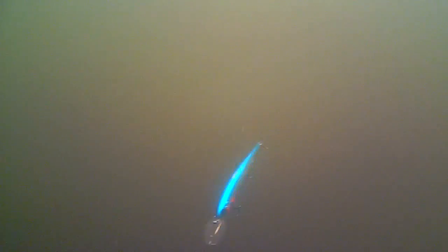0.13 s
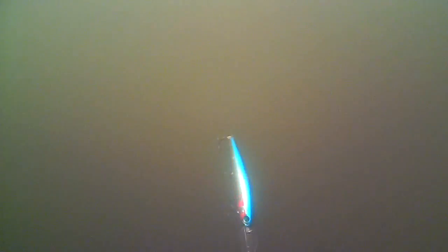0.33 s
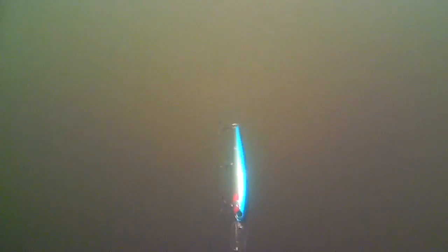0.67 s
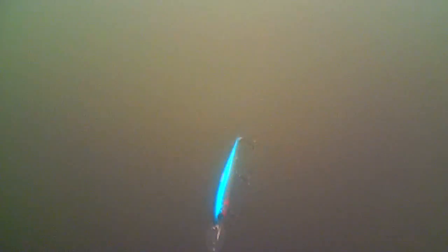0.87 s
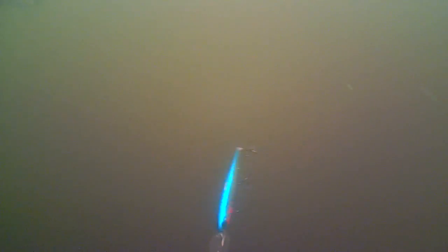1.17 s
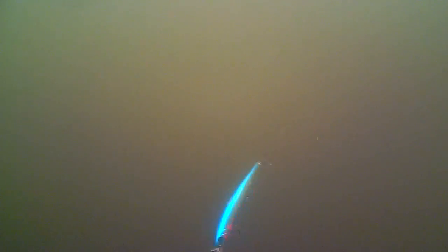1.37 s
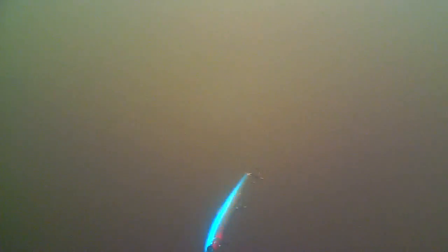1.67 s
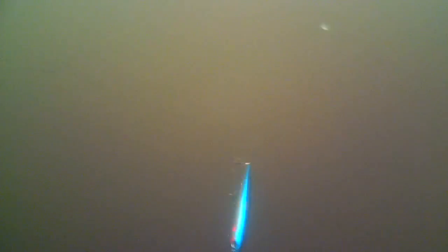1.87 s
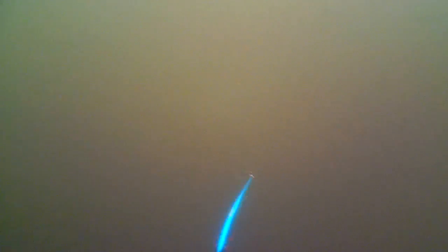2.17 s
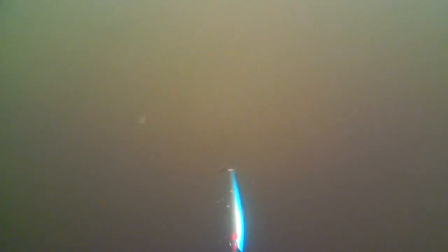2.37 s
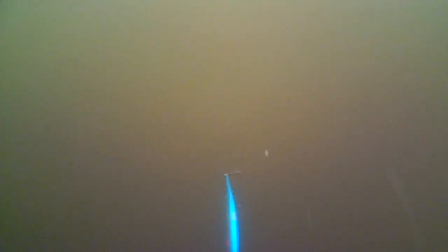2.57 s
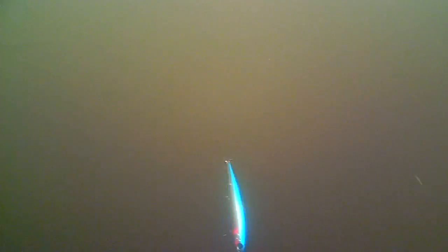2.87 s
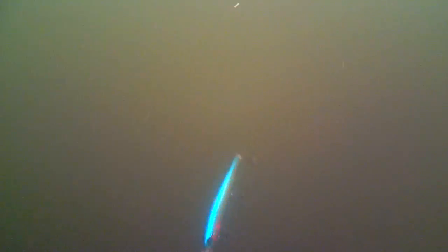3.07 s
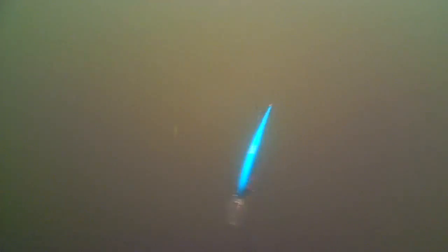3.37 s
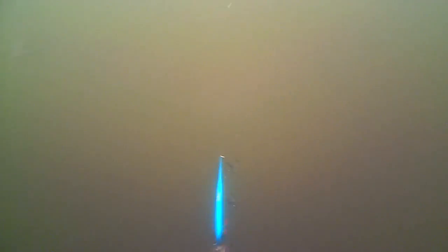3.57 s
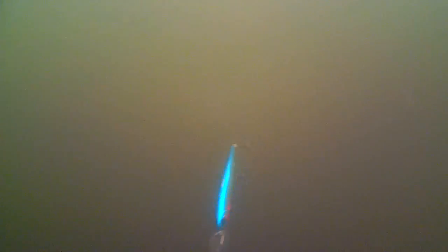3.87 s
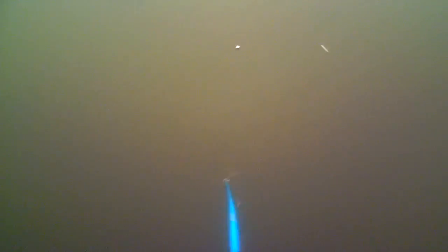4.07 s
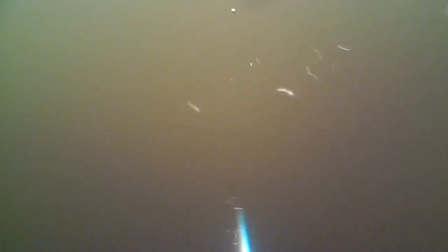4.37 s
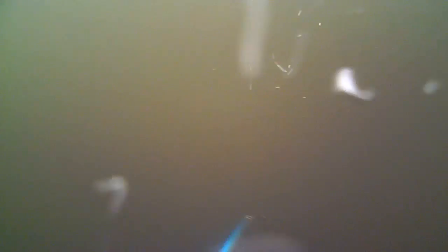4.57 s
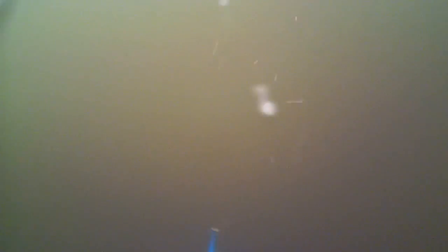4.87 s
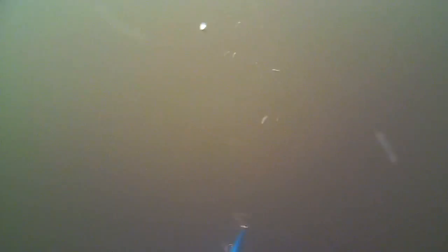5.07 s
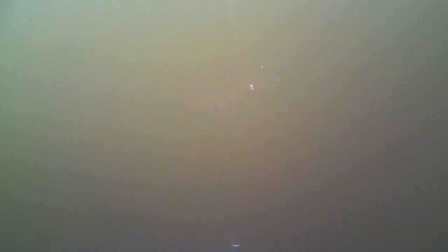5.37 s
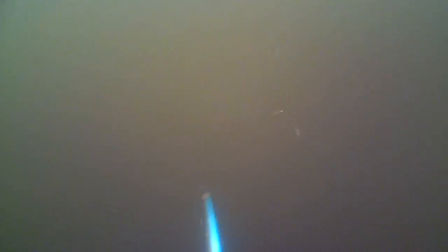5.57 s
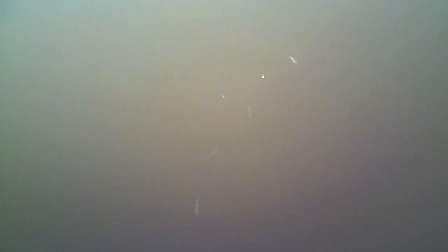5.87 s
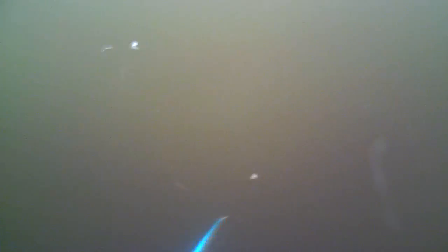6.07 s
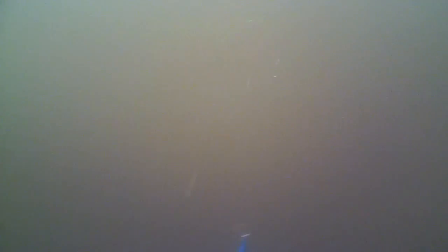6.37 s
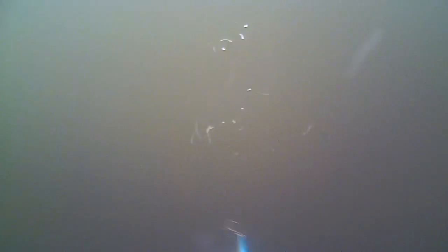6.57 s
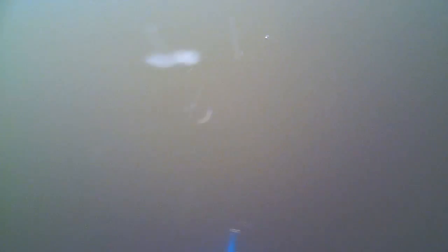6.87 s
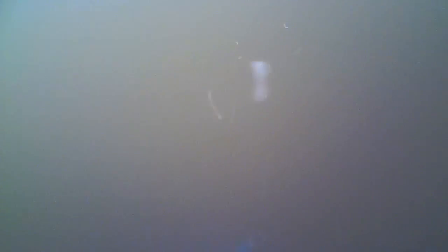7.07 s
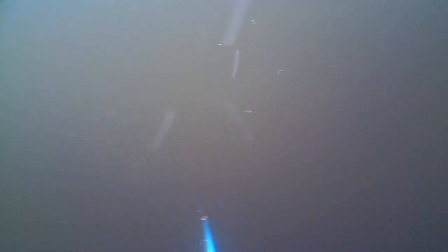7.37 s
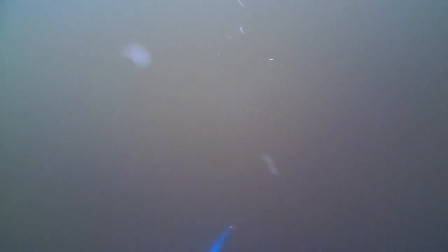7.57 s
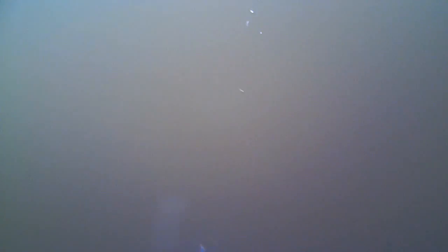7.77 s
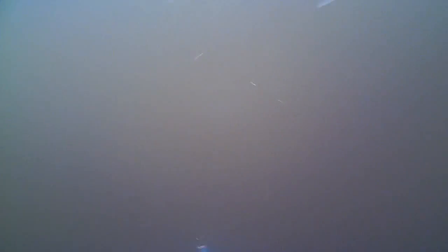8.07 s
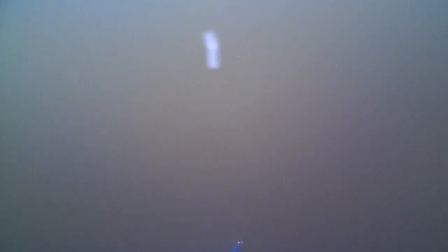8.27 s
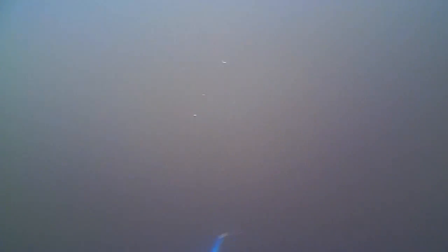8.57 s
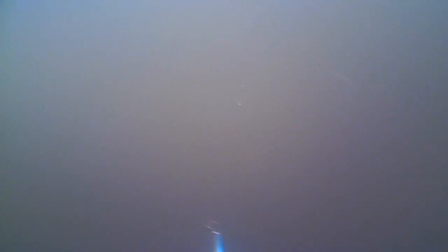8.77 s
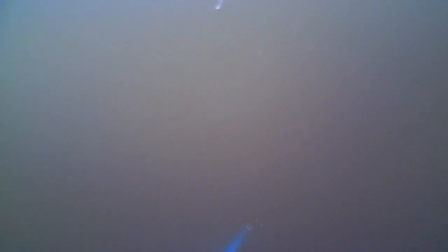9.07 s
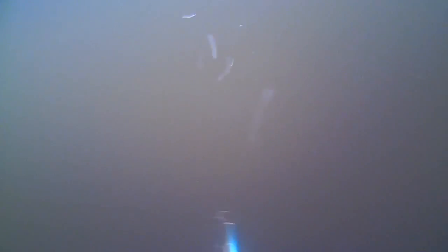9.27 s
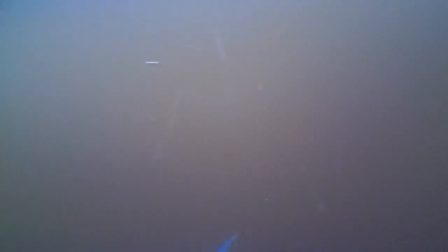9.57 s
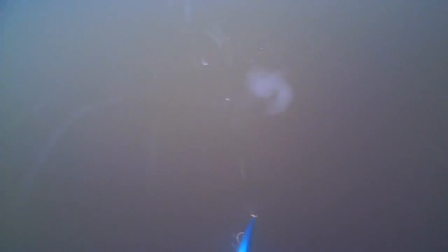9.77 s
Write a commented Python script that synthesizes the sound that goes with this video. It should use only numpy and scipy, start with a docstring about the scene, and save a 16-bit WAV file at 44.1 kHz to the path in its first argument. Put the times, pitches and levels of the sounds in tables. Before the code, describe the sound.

A close, dry underwater sound through a camera's shell. For four seconds, small hard metallic ticks come several times a second over quiet hiss, with barely audible line moans. Then sharp bubble pops and knocks lead into a dense clatter, a fluttering mid-high whine with squeaks, and fizzing, pulsing water. The whine drops out for a moment before six seconds, slow ticks return, and the loud rattling surge resumes until the end.

```python
"""A swivel rattles against the hard housing of a camera towed on a fishing line, a lure wagging behind it.
At first each slow wag gives a few separate ticks, a faint pluck and now and then a moan of the line.
Then the tow speeds up: some sixteen swings a second make the swivel clatter and the taut line whine up and down.
Sparse bubbles ping on the shell. The speed of the tow sets the pitch of the whine and the level of whine,
rattle and rushing water. Contacts ring resonances, the line is sines, and the water is coloured noise."""
import sys
import numpy as np
from scipy import signal
from scipy.fft import rfft, irfft
from scipy.io import wavfile

SR = 44100
rng = np.random.default_rng(int(sys.argv[2]) if len(sys.argv) > 2 else 0)


def digitize_waveform(pressure):
    """Quantize a signal to 16-bit integers and store it at the path in sys.argv[1].

    Rows of a 2-D input are taken as channels; values are limited to [-1, 1].
    """
    field = np.atleast_2d(pressure).T
    bounded = np.clip(field, -1, 1)
    quanta = np.round(bounded * 32767).astype(np.int16)
    wavfile.write(sys.argv[1], SR, quanta)


N = 437472
TIME = np.arange(N) / SR   # s

# slow wags of the lure: start_s [s], level_db [dB, before the trim of each kind of tick]
WAGS = [(0.1796, -30.5), (0.3078, -29), (0.4928, -29.5), (0.6235, -30.5), (0.833, -31.5), (0.9871, -27.5),
        (1.1455, -29), (1.2605, -26), (1.39, -28), (1.512, -26.5), (1.6707, -28.5), (1.7877, -27.5),
        (1.9592, -30), (2.0863, -27.5), (2.248, -29), (2.371, -28.5), (2.5243, -25.5), (2.6399, -27),
        (2.7869, -27.5), (2.9091, -29.5), (3.0744, -29.5), (3.2275, -32.5), (3.481, -35), (3.6956, -31.5),
        (3.8742, -28.5), (3.9692, -23.5), (5.7955, -25), (5.91, -21.5), (6.1702, -23.5), (6.2893, -21.5)]

CRUISE_HZ = 1400      # top pitch of the whine at cruising speed
PULL_AWAY_S = 4.09    # the tow gets up to speed
SLACK_S = .0125       # the slack goes this long before the main tick of a wag


def from_db(db):
    """Decibels to gain."""
    return 10 ** (np.asarray(db) / 20)


def rms_one(x):
    """Scale to an rms of 1."""
    return x / np.sqrt(np.mean(x ** 2) + 1e-20)


def drift(rate_hz):
    """Slow chance with a spread of 1: white noise that falls away above the given rate."""
    hz = np.arange(N // 2 + 1) * SR / N
    white = rfft(rng.standard_normal(N))
    return rms_one(irfft(white / (1 + (hz / rate_hz) ** 2), N))


def noise(spectrum):
    """Noise of a given colour, rms 1."""
    hz, db = np.transpose(spectrum)
    bins = np.maximum(np.arange(N // 2 + 1) * SR / N, 1)
    gain = from_db(np.interp(np.log(bins), np.log(hz), db, left=-80, right=-80))
    return rms_one(irfft(rfft(rng.standard_normal(N)) * gain, N))


def ring(clicks, hz, width_hz):
    """A resonance: a unit click sets a sine of height 1 ringing, which dies sooner the wider the resonance."""
    radius = np.exp(-np.pi * width_hz / SR)
    angle = 2 * np.pi * hz / SR
    return signal.lfilter([0, np.sin(angle)], [1, -2 * radius * np.cos(angle), radius ** 2], clicks + 1e-18)


def swell_ring(clicks, hz, width_hz):
    """Two like resonances in a row: the ring builds up to a height of 1, then dies."""
    twice = ring(ring(clicks, hz, width_hz), hz, width_hz)
    return twice * 2 * np.e * np.pi * width_hz / SR


def clicks_at(s, gain):
    """A train of single clicks."""
    samples = np.clip(np.round(np.atleast_1d(s) * SR).astype(int), 0, N - 1)
    return np.bincount(samples, np.atleast_1d(gain), N)


def strike(s, db, tilt_db, spread_db, bounce_db=-10, bounce_s=0.001213, slide_db=-37, slide_s=0.0062,
           scatter_db=2.5):
    """Contacts ring the housing; tilt (dB per octave) is their hardness; each bounces once and slides a little."""
    # resonances of the housing: pitch_hz [Hz], width_hz [Hz], level_db [dB]
    housing = [(1800, 360, -22.5), (3010, 190, -36), (3493, 405, -7), (4596, 390, -1), (5180, 260, -10.5),
               (5630, 470, -11), (5895, 580, -19), (6938, 403, -11), (7670, 280, -22.5), (8230, 325, -25),
               (10800, 860, -34.5), (13100, 620, -36)]
    pivot_hz = 4550        # the tilt turns about this pitch
    soft_limit_hz = 4630   # below this every contact is short enough to ring the modes alike

    hardness = tilt_db + spread_db * rng.uniform(-1, 1, len(s))
    again = s + bounce_s * rng.uniform(.5, 1.4, len(s))
    sign = rng.choice([-1, 1], len(s))

    # a slide is noise under a pressure that dies away after each contact
    touches = clicks_at(s, from_db(db + slide_db))
    pressure = signal.lfilter([1], [1, -np.exp(-1 / (slide_s * SR))], touches + 1e-18)
    slide = pressure * rng.standard_normal(N)

    out = np.zeros(N)
    for hz, width_hz, mode_db in housing:
        octaves = np.log2(max(hz, soft_limit_hz) / pivot_hz)
        hit_db = db + hardness * octaves + scatter_db * rng.standard_normal(len(s))
        gain = sign * from_db(hit_db)
        hits = clicks_at(np.r_[s, again], np.r_[gain, gain * from_db(bounce_db)])
        out += from_db(mode_db) * swell_ring(hits + slide, hz, width_hz)
    return out


def tow():
    """Speed in doublings above cruising, and swings counted through time (whole numbers at their fastest instants)."""
    # course of the tow: time_s [s], top_pitch_hz [Hz, whine before scatter], swings [count since the row before]
    course = [(4.157, 1264, 0), (4.413, 1359, 4), (4.683, 1261, 4), (4.95, 1371, 4), (5.152, 1273, 3),
              (5.31, 1178, 2), (5.437, 1406, 2), (5.565, 1364, 2), (5.739, 920, 2), (6.32, 896, 6),
              (6.378, 1390, 1), (6.48, 1500, 2), (7.12, 1500, 11), (7.42, 1421, 5), (7.564, 1319, 2),
              (8.2, 1279, 9), (8.39, 1470, 3), (8.595, 1268, 3), (8.864, 1379, 4), (9.185, 1408, 5),
              (9.354, 1503, 3), (9.612, 1294, 4), (9.775, 1598, 3.5), (9.89, 1461, 2.5)]
    s, hz, swings = np.transpose(course)
    done = np.cumsum(np.round(swings))
    rate = np.diff(done) / np.diff(s)

    # the first and last swing rates carry on beyond the table
    phase = np.interp(TIME, s, done)
    phase = phase + rate[0] * np.minimum(TIME - s[0], 0) + rate[-1] * np.maximum(TIME - s[-1], 0)
    speed = np.log2(np.interp(TIME, s, hz) / CRUISE_HZ)
    return speed, phase


def per_swing(phase):
    """Chance with a spread of 1, drawn anew for each swing and gliding from one to the next."""
    swings = np.arange(int(phase[-1]) + 2)
    return np.interp(phase, swings, rng.standard_normal(len(swings)))


def hiss(level_db=-59):
    """The steady noise floor: coloured noise at one level throughout."""
    # spectrum of the floor: pitch_hz [Hz], level_db [dB per Hz, relative]
    floor = [(40, 9.5), (130, 14), (330, 10), (460, 9.5), (620, 6), (1500, 3.5), (3400, 2.5), (5500, -1),
             (15000, -2), (16200, -7)]
    return from_db(level_db) * noise(floor)


def water(speed, phase, throb_db=3.0, fizz_throb_db=5.0, idle_db=-63.0, lumpy_db=1.0):
    """Water rushes and fizzes along the shell, throbbing with the swings; eddies buffet it."""
    # spectra of the three noises: pitch_hz [Hz], level_db [dB per Hz, relative]
    rush_colour = [(300, -40), (480, 8.5), (680, -26.5), (850, -1), (1050, -6.5), (1450, 10), (1900, 3.5),
                   (2200, 3.5), (2500, -4.5), (2900, 7), (3150, 5), (3450, 15), (3900, -1), (4550, 1.5),
                   (6500, -6.5)]
    fizz_colour = [(4000, -44), (8000, 4.5), (9700, -1.5), (10900, -3), (11900, -2), (12800, -4.5),
                   (14000, -8), (15200, -3), (16200, -12)]
    rumble_colour = [(18, 4), (35, 0.5), (55, -3), (100, -10), (200, -23), (400, -39)]
    # big eddies: centre_s [s], level_db [dB, before the lumpiness], half_length_s [s]
    eddy_table = [(3.754, -52.5, .05), (6.8, -55, 0.56), (6.778, -50, .025), (6.869, -58, 0.024),
                  (9.278, -50, 0.089), (9.78, -48.5, .12)]
    # dB at cruising speed, and dB gained per doubling of the speed
    rush_db, rush_growth_db = -44, 17.5
    fizz_db, fizz_growth_db = -61, 20
    buffet_db, buffet_growth_db = -61, 18

    throb = np.cos(2 * np.pi * (phase + 0.092))
    towed = np.interp(TIME - PULL_AWAY_S, [-.2, 0], [0, 1]) ** 3

    rush_level = rush_db + rush_growth_db * speed + throb_db * throb + 3 * drift(68)
    rush = from_db(rush_level) * noise(rush_colour)

    fizz_level = fizz_db + fizz_growth_db * speed + fizz_throb_db * throb
    fizz_level = fizz_level + 6.25 * drift(140) + 0.5 * drift(4.3)
    fizz = from_db(fizz_level) * noise(fizz_colour)

    eddies = sum(from_db(db) * np.exp(-((TIME - s) / half_s) ** 2) for s, db, half_s in eddy_table)
    eddies = eddies * from_db(lumpy_db * drift(15))
    steady = towed * from_db(buffet_db + buffet_growth_db * speed)
    # the powers of the idle rumble, the tow and the eddies add
    buffet = np.sqrt(from_db(idle_db) ** 2 + steady ** 2 + eddies ** 2)
    return towed * (rush + fizz) + buffet * noise(rumble_colour)


def slow_ticking(main_db=-3, lead_db=-11.0, chaser_db=-10, chaser_s=.009, rebound_db=-10, rebound_s=0.037,
                 settle_db=-16, settle_fall_db=110, lead_tilt_db=11, main_tilt_db=-6, settle_tilt_db=1,
                 tick_scatter_db=2.5, count=4):
    """Each wag: a bright tick as the slack goes, the main tick and its chaser, a rebound, then settling ticks."""
    s, db = np.transpose(WAGS)
    chase = chaser_s * rng.uniform(0.8, 1.2, len(s))
    rebound = rebound_s * rng.uniform(.7, 1.1, len(s))
    after = chase + np.cumsum(rng.uniform(.006, 0.0089, (count, len(s))), axis=0)
    times = np.vstack([s - SLACK_S, s, s + chase, s + rebound, s + after])

    # rows: lead, main, chaser, rebound, then settling ticks that fall by settle_fall_db per second
    first_four = np.outer([lead_db, main_db, chaser_db, rebound_db], np.ones(len(s)))
    levels = db + np.vstack([first_four, settle_db - settle_fall_db * after])
    levels[2:] += tick_scatter_db * rng.standard_normal(levels[2:].shape)

    row_tilts = [lead_tilt_db, main_tilt_db, settle_tilt_db, main_tilt_db] + [settle_tilt_db] * count
    tilts = np.repeat(row_tilts, len(s))
    return strike(times.ravel(), levels.ravel(), tilts, spread_db=4.5)


def pluck(level_db=-34, hz=1900, width_hz=40, count=5):
    """Taking up the slack plucks the rig, whose cluster of modes rings faintly for a moment."""
    s, db = np.transpose(WAGS)
    out = np.zeros(N)
    for detune in np.linspace(.9, 1.07, count):
        gain = from_db(db + level_db) * rng.standard_normal(len(s))
        out += ring(clicks_at(s - SLACK_S, gain), hz * detune, width_hz)
    return out


def moans(hz=470, rise=1.6, width_s=0.026):
    """At slow tow the line only moans briefly, rising a little as a wag pulls on it."""
    # moans of the line: centre_s [s], level_db [dB]
    moan_table = [(1.22, -66), (1.46, -67), (1.58, -65), (1.71, -68), (2.451, -62), (2.58, -59),
                  (2.721, -63), (2.849, -55.5)]
    out = np.zeros(N)
    waver = 1 + 0.036 * drift(39)
    for s, db in moan_table:
        age = np.clip(TIME - s, -.2, .2)
        pitch_hz = hz * (1 + rise * age) * waver
        swell = np.exp(-(age / width_s) ** 2)
        out += from_db(db) * swell * np.sin(2 * np.pi * np.cumsum(pitch_hz) / SR)
    return out


def bubbles(thud_width_hz=260, burst_s=0.0029):
    """A bubble bursts on the shell with a short rough ping and a thud."""
    # bubbles: start_s [s], peak_db [dB], pitch_hz [Hz], t60_s [s, ping falls 60 dB], thud_db [dB, thud against ping]
    bubble_table = [(1.8587, -28.5, 3780, 0.012, -6), (3.9215, -21.5, 7850, 0.0069, -22),
                    (4.087, -33, 2760, .012, -20), (4.1013, -19, 3400, 0.0075, -41),
                    (4.1445, -18, 3550, 0.019, -34), (4.224, -18, 9600, 0.0016, -28),
                    (5.63, -47, 11100, 0.0043, -20), (5.863, -28, 3590, 0.01, -2),
                    (6.0957, -39, 10800, .005, -18)]
    # the housing answers a soft blow at these pitches: pitch_hz [Hz]
    thud_pitches = [1120, 1470, 1790, 2060, 4900]
    highpass = signal.butter(4, 950, "high", fs=SR, output="sos")

    out = np.zeros(N)
    age = np.arange(SR // 20) / SR
    for s, db, hz, t60, thud_db in bubble_table:
        # one click and a short burst of noise
        push = np.exp(-age / burst_s) * rng.standard_normal(len(age)) * 0.08 + (age == 0)
        ping = ring(push, hz, np.log(1000) / (np.pi * t60))
        thud = sum((-1) ** k * ring(push, thud_hz, thud_width_hz) for k, thud_hz in enumerate(thud_pitches))
        blow = signal.sosfilt(highpass, ping + from_db(thud_db) * thud)
        at = round(s * SR)
        out[at:at + len(blow)] += from_db(db) * blow / np.abs(blow).max()
    return out


def knocks(speed, phase, hard_db=-1, lead_turns=.22, loose_turns=.12, spread_db=2.0):
    """The swivel knocks about once in each swing, just before its fastest instant; listed knocks are much harder."""
    # the hardest knocks: start_s [s], level_db [dB, before the trim hard_db]
    hard_knocks = [(4.0485, -24.5), (4.0638, -24), (4.0763, -21), (4.201, -22.5), (4.3334, -20),
                   (4.39, -21), (4.519, -19), (4.7367, -21), (4.9249, -19), (5.2851, -25.5), (5.5464, -21),
                   (5.7174, -30), (5.986, -23.5), (5.9944, -23), (6.012, -24.5), (6.1234, -27),
                   (6.4691, -19), (6.5247, -19.5), (6.5757, -19.5), (6.7593, -18), (6.9181, -18),
                   (6.9834, -18), (7.04, -18.5), (7.2772, -18.5), (7.889, -18), (7.952, -18), (8.2339, -19),
                   (8.434, -20.5), (8.4944, -19.5), (8.726, -24), (8.7842, -21.5), (9.654, -17),
                   (9.7256, -18), (9.763, -18), (9.774, -19), (9.8206, -19.5), (9.8672, -18)]
    knock_db, knock_growth_db = -25.5, 11   # dB at cruising speed, dB per doubling of the speed

    s, db = np.transpose(hard_knocks)
    swings = np.arange(int(phase[-1]) + 1)
    turns = swings - lead_turns + loose_turns * rng.standard_normal(len(swings))
    when = np.interp(turns, phase, TIME)
    level = knock_db + knock_growth_db * np.interp(when, TIME, speed)
    level = level + spread_db * rng.standard_normal(len(swings))
    # an ordinary knock gives way to a hard one close by
    free = np.abs(when[:, None] - s).min(axis=1) > .008
    return np.r_[s, when[free]], np.r_[db + hard_db, level[free]]


def clatter(speed, phase, bunch_db=5.5, lead_turns=0.32, gap_s=.0058,
            light_tilt_db=5.0, snap_tilt_db=3.5, snap_turns=0.5, count=1200):
    """Hard knocks, and a light rattle that is strongest while each swing gathers speed."""
    rattle_db, rattle_growth_db = -31, 20.5   # dB at cruising speed, dB per doubling of the speed
    swing_scatter_db, tick_scatter_db, ceiling_db = 2.2, 4.8, -24

    s, db = knocks(speed, phase)
    light = PULL_AWAY_S + np.cumsum(gap_s * rng.uniform(0.44, 1.9, count))
    at = np.interp(light, TIME, phase)
    level = rattle_db + rattle_growth_db * np.interp(light, TIME, speed)
    level = level + bunch_db * np.cos(2 * np.pi * (at + lead_turns))
    level = level + swing_scatter_db * np.interp(light, TIME, per_swing(phase))
    level = np.minimum(level + tick_scatter_db * rng.standard_normal(count), ceiling_db)

    # the first ticks of a swing, as the slack goes, are the brightest
    tilt = light_tilt_db + snap_tilt_db * np.cos(2 * np.pi * (at + snap_turns))
    level = level - .5 * np.maximum(tilt, 0)   # brighter ticks are set lower

    # the swivel cannot touch twice at once: no light tick close to a knock
    free = (np.abs(light[:, None] - s).min(axis=1) > .003) & (light < TIME[-1])
    hard = strike(s, db, tilt_db=-3, spread_db=2.5)
    return hard + strike(light[free], level[free], tilt[free], spread_db=5)


def singing_line(speed, phase, slowest=.65, steadying=.33, swell_db=54, trough_db=-53, trough_growth_db=5,
                 hum_db=-52, pull_growth_db=5, hum_hz=480, hum_width_hz=110,
                 overtone_db=-17, overtone_scatter_db=3, waver=0.02818, squeak_s=0.013):
    """Vortices leave the line at a rate that follows its speed: a hum across the flow, a whine at twice that along it."""
    # the loudest squeaks, an octave above the whine: centre_s [s], level_db [dB]
    squeak_table = [(4.872, -44), (5.07, -43), (5.422, -37), (6.585, -46), (7.047, -45), (7.288, -42),
                    (7.831, -36), (8.663, -35), (8.731, -39), (9.536, -36)]
    whine_db, whine_growth_db = -29.5, 52   # dB at cruising speed, dB per doubling of the speed
    swing_scatter_db, swing_scatter_pitch = 1.6, .018   # dB, fraction of the pitch
    line_scatter_db, wobble_turns = 3, .045
    whine_rough, hum_rough = .36, .35   # depth of the rough level

    vigour = per_swing(phase)
    top_hz = CRUISE_HZ * 2 ** speed * (1 + swing_scatter_pitch * vigour)
    level_db = whine_db + whine_growth_db * speed + swing_scatter_db * vigour

    # the pitch sags between swings, most deeply at slow tow
    slack = np.sin(np.pi * (phase + wobble_turns * drift(25.6))) ** 2
    sag = (1 - slowest - steadying * speed) * slack
    hz = top_hz / 2 * (1 - sag) * (1 + waver * drift(176.5))
    turn = 2 * np.pi * np.cumsum(hz) / SR

    taut = np.interp(TIME - PULL_AWAY_S, [0, .09], [0, 1])
    pull = from_db(pull_growth_db * speed + line_scatter_db * (per_swing(phase) - .5))
    trough = from_db(trough_db + trough_growth_db * speed) * pull
    whine = from_db(level_db - swell_db * slack ** 1.23) + trough

    # the hum swells as it passes a low resonance of the rig
    below = np.where(hz < hum_hz, (hz / hum_hz) ** 4, 1)
    resonance = below / np.sqrt(1 + ((hz - hum_hz) / hum_width_hz) ** 2)
    hum = from_db(hum_db) * pull * resonance

    # the octave above the whine speaks unevenly while the line is tightening
    tightening = np.maximum(0, np.cos(2 * np.pi * (phase + 0.27))) ** 2
    squeak = from_db(level_db + overtone_db + overtone_scatter_db * per_swing(phase)) * tightening
    squeak = squeak + sum(from_db(db) * np.exp(-((TIME - s) / squeak_s) ** 2) for s, db in squeak_table)

    whine_tone = whine * np.sin(2 * turn + 0.29 * drift(133)) * (1 + whine_rough * drift(83))
    hum_tone = hum * np.sin(turn) * (1 + hum_rough * drift(45))
    squeak_tone = squeak * np.sin(4 * turn + 0.23 * drift(130))
    return taut * (whine_tone + hum_tone + squeak_tone)


def scene():
    """Swivel, line, bubbles and water, heard through the housing, over a steady hiss."""
    speed, phase = tow()
    swivel = slow_ticking() + clatter(speed, phase)
    line = pluck() + moans() + singing_line(speed, phase)
    mix = hiss() + water(speed, phase) + swivel + line + bubbles()
    return mix[None]


def record(dry):
    """The converter sits slightly off zero; a steep low-pass cuts the top."""
    offset, cutoff_hz = -.0066, 16200
    lowpass = signal.ellip(10, .2, 80, cutoff_hz, fs=SR, output="sos")
    return offset + signal.sosfilt(lowpass, dry)


dry = scene()
out = record(dry)
digitize_waveform(out)
```